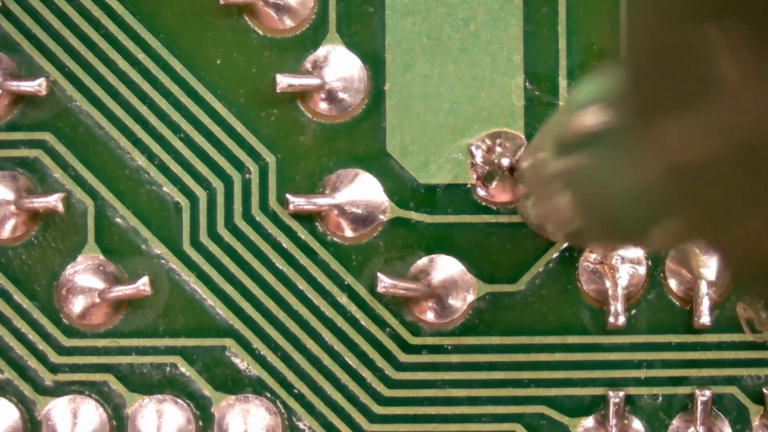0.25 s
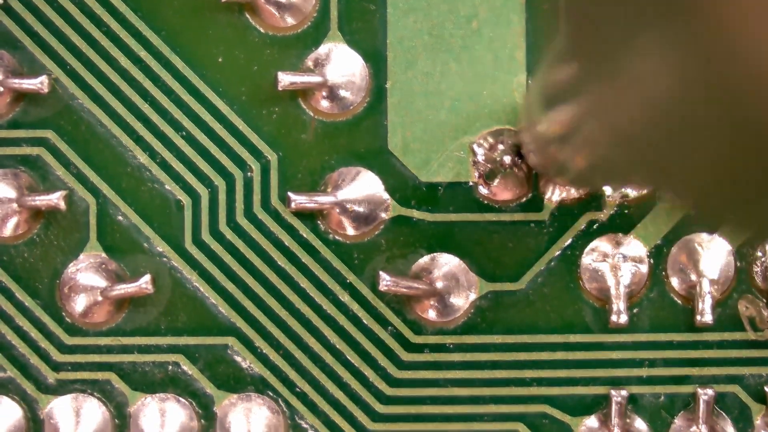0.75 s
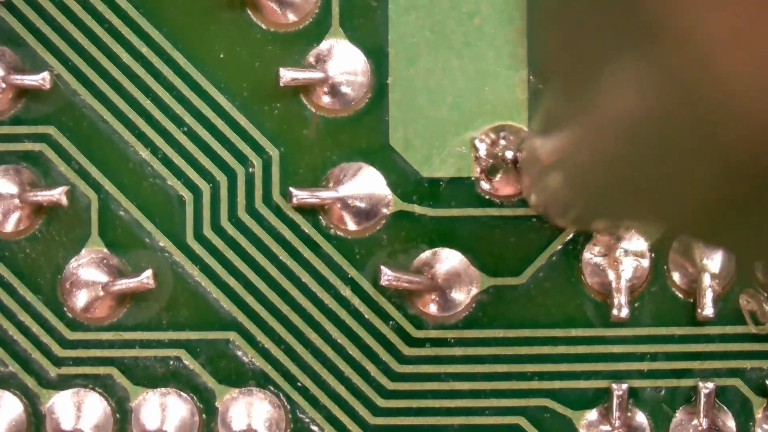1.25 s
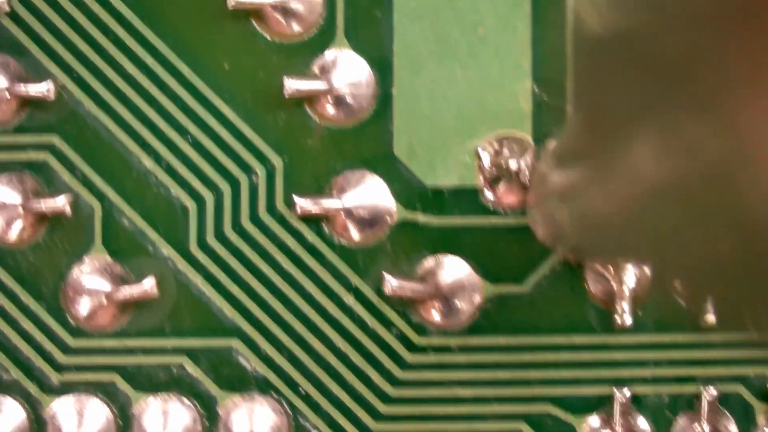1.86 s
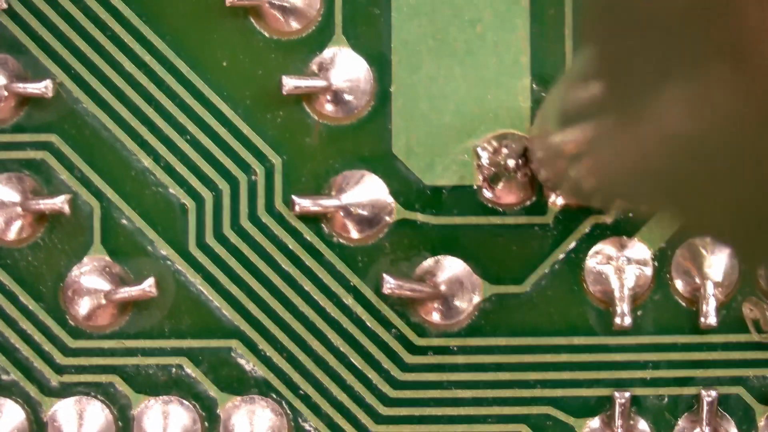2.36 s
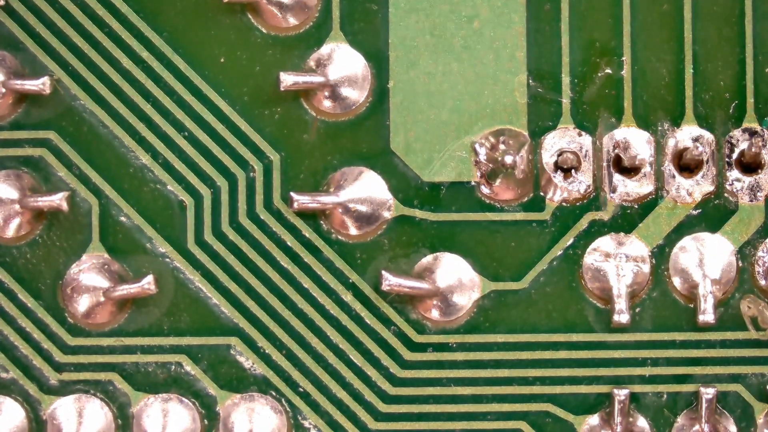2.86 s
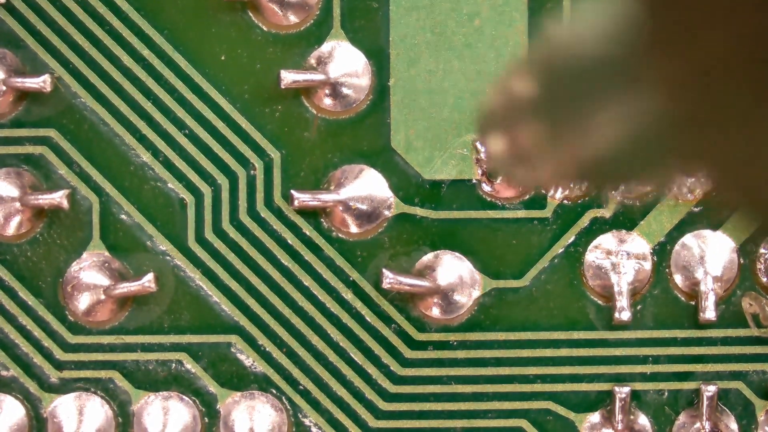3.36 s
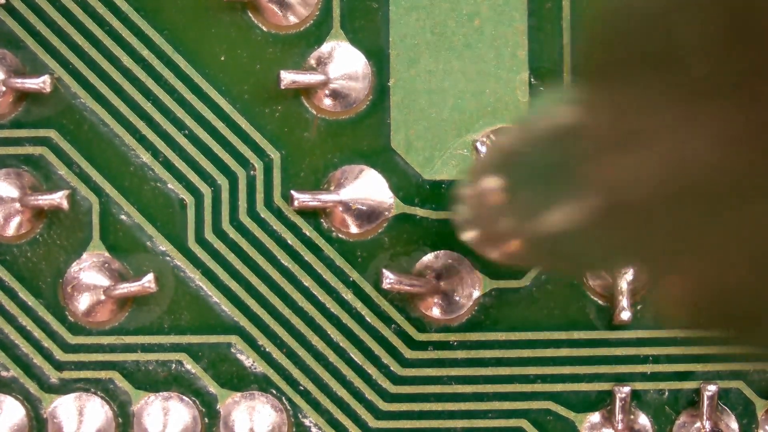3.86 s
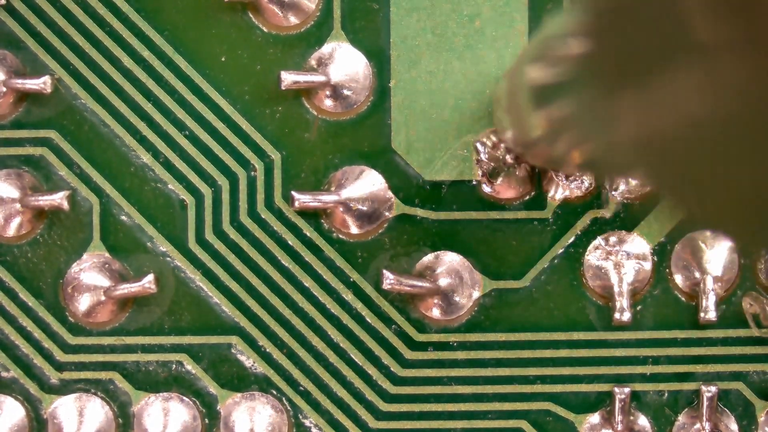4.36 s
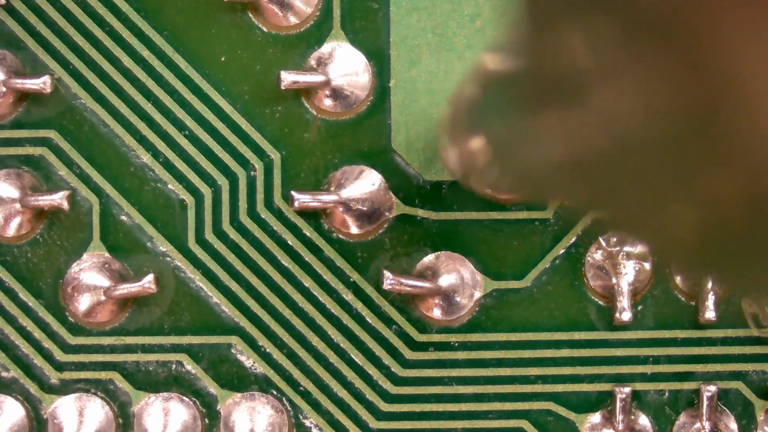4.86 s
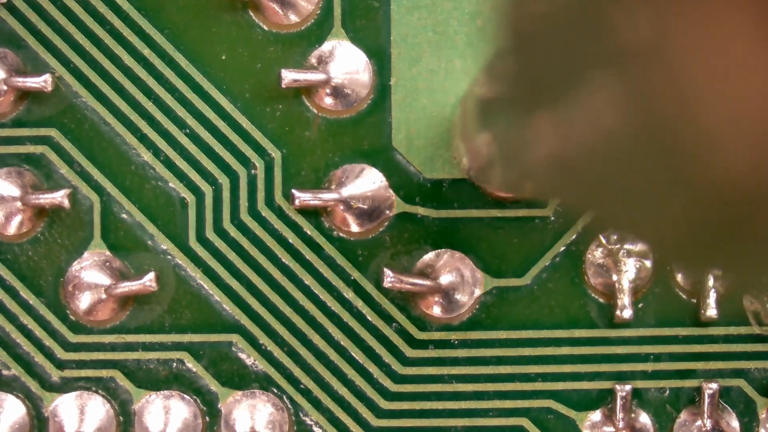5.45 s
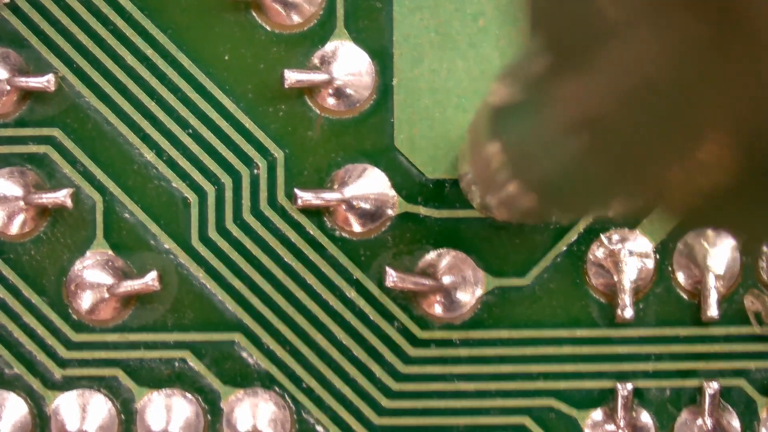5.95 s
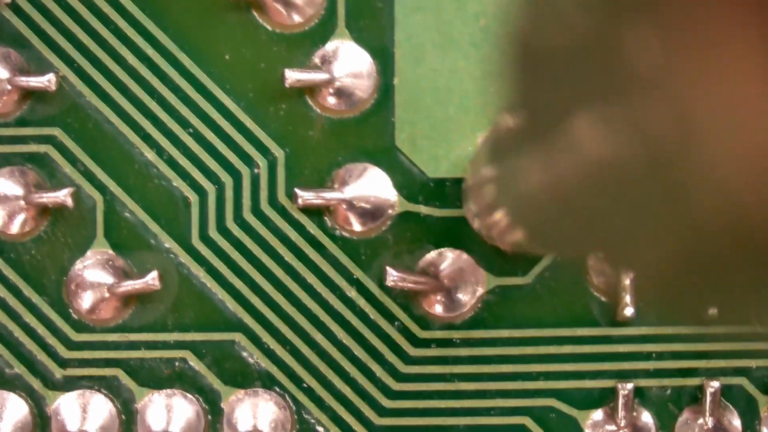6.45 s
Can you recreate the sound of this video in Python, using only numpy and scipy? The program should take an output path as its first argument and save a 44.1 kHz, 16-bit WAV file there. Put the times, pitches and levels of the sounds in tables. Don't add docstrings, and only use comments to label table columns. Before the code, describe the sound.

On a workbench in a quiet room, a small diaphragm pump drones with a rattly, rapid buzz while air hisses into a hot tip. Small scratchy ticks come as the tip rubs solder pins. Twice the tip seals: the hiss drops away and the motor dips slightly, rising in pitch on the longer seal, then air bursts back. Scraping gets busier toward the end. Close stereo microphone, hiss leaning right.

```python
import sys
import numpy as np
from scipy import signal
from scipy.fft import rfft, irfft
from scipy.io import wavfile
from scipy.ndimage import uniform_filter1d

SR = 44100
rng = np.random.default_rng(int(sys.argv[2]) if len(sys.argv) > 2 else 0)


def master_out(mix):
    frames = np.transpose(np.atleast_2d(mix))
    ceiling = np.clip(frames, -1, 1)
    pcm = np.round(ceiling * 32767).astype(np.int16)
    wavfile.write(sys.argv[1], SR, pcm)


def field_ratio(decibels):
    return 10 ** (np.asarray(decibels, dtype=float) / 20)


N = 295138

# hz, level_db_per_hz
ROOM_SPECTRUM = [(25, -11), (60, -1.2), (150, -3.5), (300, -12.5), (450, -5), (700, -11.5), (1400, -14),
                 (2600, -15), (4500, -21), (8000, -26), (11000, -51), (16000, -16)]
# hz, rms_db
MAINS_HUM = [(120.0, -68)]
# seal_s, free_s, closing_time_s
SEALS = [
    (0.739, 1.525, .025),
    (3.353, 4.447, 0.052),
]
# time_after_seal_s, vacuum (0 open .. 5 deep)
VACUUM_BUILD = [(0, 0), (.09, 1), (.24, 2), (.37, 3), (.53, 4), (.8, 4.8), (1.09, 5)]
# time_after_free_s, share_of_vacuum_left
VACUUM_VENT = [(0, 1), (.045, .64), (.095, .19), (.2, .08), (.33, .02), (.5, 0)]
# vacuum, strokes_hz
MOTOR_PACE = [(0, 49.65), (.5, 49.25), (1.2, 48.9), (2, 49.25), (3, 49.95), (4, 51.05), (4.8, 52.3),
              (5, 52.9)]
# time_s, peak_db, ring_hz, brightness_db
TICKS = [(0.117, -51.5, 2500, -12), (0.2266, -51.5, 3170, -7), (0.442, -45.5, 2490, -10),
         (0.614, -46.5, 3200, 11), (1.147, -56, 1760, -10), (1.854, -52, 3320, -13),
         (1.99, -53.5, 2440, 15.5), (2.1217, -47.5, 3020, -6), (2.401, -48.5, 2500, -9),
         (2.657, -52, 2490, -14), (2.9795, -49, 2200, -3), (3.404, -50, 2410, 2), (3.8603, -53, 1790, -12),
         (4.29, -44.5, 2500, -2), (4.7493, -43, 3000, 5), (4.871, -46.5, 2360, -2),
         (4.998, -43.5, 2540, -12), (5.2704, -43, 3150, -4), (5.408, -45.5, 2170, -12),
         (5.5892, -40.5, 3700, 7.5), (5.681, -46.5, 2220, -19), (5.83, -38.5, 3180, 1),
         (5.976, -47, 2190, -16), (6.1217, -39.5, 3100, 3.5), (6.248, -46.5, 1720, -17),
         (6.4094, -39, 2520, -3), (6.548, -47, 2270, -13)]
# time_s, peak_db, ring_hz, pan_db, contact_ms
KNOCKS = [(1.26, -51, 1210, 0, 0.47), (1.533, -39, 950, 8.5, 0.023), (3.307, -46.5, 1890, 12, 0.05),
          (3.887, -42.5, 1160, -7, 0.17), (4.285, -47, 1240, -6, .37), (4.2881, -45, 1250, -2, .27),
          (4.2911, -41.5, 680, 5, 0.11), (4.295, -42, 1080, -10, 0.16), (4.87, -45, 1190, -6, .14),
          (5.15, -43.5, 2300, -5, 0.092), (1.55, -67, 372, 9, 0.58), (4.482, -51.5, 420, 6, 0.98),
          (6.409, -49, 1390, -5, 0.074)]
# hz, width_hz, gain_db
BOARD_MODES = [(1250, 450, 2.5), (1800, 156, 4.5), (2244, 117, 4), (2780, 670, 6.5), (3440, 780, 4),
               (4630, 250, 3), (6700, 920, 1.5)]
# start_s, length_s, gain_db
GUSTS = [(0, 0.098, 2), (0.252, 0.11, 2.5), (.61, 0.16, 2), (1.516, 0.019, 10), (1.66, 0.17, 3),
         (1.98, .1, 5.5), (2.254, 0.16, 3), (2.454, .2, 2), (3.105, .15, 1.5), (4.459, 0.29, 11.5),
         (4.856, 0.02, 12), (4.974, 0.03, 12), (5.258, 0.027, 8.5), (5.39, 0.39, 2.5), (5.81, 0.12, 5.5),
         (6.037, .06, 3), (6.12, 0.098, 8), (6.283, 0.069, 4.5), (6.388, 0.13, 6), (6.554, .12, 5.5)]
# hz, level_db_per_hz
JET_SPECTRUM = [(6470, -27), (11000, -30.5), (12100, -21), (13400, -7.5), (15100, -2), (15800, -2.5)]
# hz, level_db_per_hz
RUSH_SPECTRUM = [(1470, -22), (2500, -5.5), (2670, -5), (3500, -6.5), (3800, -4), (4200, -9), (7050, -1),
                 (8630, 1.5), (10800, -6), (12500, -3), (16200, -39), (22000, -120)]
VALVE_LEVELS = [-67, -65, -67, -65.5, -65, -63]
# hz, level_db_per_hz
VALVE_SPECTRUM = [(350, -42), (600, -3), (689, -0.5), (781, -73), (1000, -2.5), (1240, -3.5), (1830, -14),
                  (1970, -23), (3470, -14), (8030, -8), (12000, -45), (15600, -96), (22000, -120)]
HARMONIC_VACUUM = [0, 1, 2, 3, 4.1, 4.8]
LOW_HARMONICS = [(-76, -76, -76, -74, -72, -69), (-64, -64, -64, -67, -71, -72),
                 (-58, -55, -54, -55, -60, -65), (-72, -74, -68, -68, -70, -71),
                 (-85, -72, -72, -87, -77, -72), (-72, -75, -71, -74, -84, -76),
                 (-62, -71, -70, -59, -60, -75), (-59, -54, -61, -54, -54, -67),
                 (-58, -61, -63, -62, -57, -65), (-70, -67, -63, -69, -70, -69),
                 (-63, -67, -68, -64, -63, -72), (-70, -69, -69, -65, -68, -67),
                 (-66, -75, -72, -73, -65, -66)]
# left_over_right_db, left_lead_open_rad, left_lead_sealed_rad
HARMONIC_PATHS = [(4, -.1, .1), (1, .1, -.1), (0, .1, .1), (-2, .2, .2), (0, .6, .4), (-2, .4, .3),
                  (1, .2, .4), (-4, 1.35, 1.1), (4, 1.2, 1.1), (0, 1.3, 3.1), (-3, .7, 2.1), (3, 2.7, 2.7),
                  (9, 1.3, .9)]
PHASE_SCATTER = [1.95, 1.1, 0.94, 1.1, 0.53, 0.95]
# hz, width_hz, rms_db, gain_at_deep_vacuum_db, left_lead_rad
CASING_MODES = [(725, 70, -77, 4, .3), (810, 60, -74, -1, .9), (885, 50, -69.5, 4, 1.5),
                (985, 70, -65.5, 3, 2.0), (1040, 80, -69, 2, 2.1), (1220, 130, -77.5, .5, 3),
                (1405, 90, -77, 5.5, 0), (1615, 110, -68, -3, -2.7), (1690, 60, -73.5, -3, 0),
                (1880, 110, -80, 7, -1.2), (2030, 150, -85, .5, 1.2), (2490, 110, -81.5, 5, .3)]


def rms_one(x):
    return x / np.sqrt(np.mean(x ** 2) + 1e-20)


def drift(rate_hz):
    r = np.exp(-80 * np.pi * rate_hz / SR)
    noise = rng.standard_normal(N // 40 + 2002)
    slow = rms_one(signal.lfilter([1], [1, -2 * r, r * r], noise)[2000:])
    return np.interp(np.arange(N) / 40, np.arange(len(slow)), slow)


def coloured(x, spectrum):
    hz, db = np.transpose(spectrum)
    bin_hz = np.fft.rfftfreq(N, 1 / SR) + 1
    gain_db = np.interp(np.log(bin_hz), np.log(hz), db, left=-90, right=db[-1])
    return rms_one(irfft(rfft(x) * field_ratio(gain_db), N))


def stereo_noise(alike, lag_s):
    common, left, right = rng.standard_normal((3, N))
    shared = np.array([np.roll(common, round(lag_s * SR)), common])
    return np.sqrt(alike) * shared + np.sqrt(1 - alike) * np.array([left, right])


def resonance(x, hz, width_hz):
    r = np.exp(-np.pi * width_hz / SR)
    zeros = np.array([1, 0, -1]) * (1 - r * r) / 2
    return signal.lfilter(zeros, [1, -2 * r * np.cos(2 * np.pi * hz / SR), r * r], x)


def along(points, x):
    return np.interp(x, *np.transpose(points))


def by_vacuum(vacuum, values):
    return np.interp(vacuum, np.arange(len(values)), values)


def room():
    t = np.arange(N) / SR
    hum = 0
    for hz, db in MAINS_HUM:
        hum = hum + np.sqrt(2) * field_ratio(db + 1.3 * drift(12.0)) * np.sin(2 * np.pi * hz * t)
    noise = stereo_noise(0.048, 0)
    low = signal.butter(2, 300, fs=SR, output="sos")
    noise += signal.sosfilt(low, rng.standard_normal(N) * 0.63 - noise)
    return field_ratio(-61.5) * coloured(noise, ROOM_SPECTRUM) + hum


def tip(contacts, grit, note_db, width_hz, early, swell):
    out, size = np.zeros((2, N)), 4096
    t = np.arange(size) / SR
    for time_s, peak_db, ring_hz, pan_db, length_s, bright_db in contacts:
        noise = rng.standard_normal((3, size))
        push = (t / length_s * np.exp(1 - t / length_s)) ** swell
        rasp = push * (1 - grit + grit * (noise[0] + 0.88 * noise[1:]))
        rattle = (1 - np.exp(-t / 0.0022)) * np.exp(-t / 0.029)
        rasp += 0.34 * noise[1:] * rattle * np.sqrt(length_s / 0.0013)

        strengths_db = rng.normal(0, 1.8, len(BOARD_MODES))
        body = 0
        for k, ((hz, mode_width_hz, gain_db), extra_db) in enumerate(zip(BOARD_MODES, strengths_db)):
            tilt_db = 0.38 * (bright_db + 0.5) * np.log2(hz / 2500)
            mode = resonance(rasp, hz, mode_width_hz)
            body = body + field_ratio(gain_db + extra_db + tilt_db) * mode * (-1) ** k
        body = body + field_ratio(note_db) * resonance(rasp, ring_hz, width_hz)
        bright = resonance(rasp, 10500, 8600)

        hit = body / np.abs(body).max() + field_ratio(bright_db - 8.0) * bright / np.abs(bright).max()
        at = round((time_s - early * length_s) * SR)
        pan = field_ratio([[pan_db / 2], [-pan_db / 2]])
        out[:, at:at + size] += field_ratio(peak_db + 3.0) * pan * hit[:, :N - at]
    return out


def scrapes():
    contacts = [(time_s, db, hz, 0.5, 0.008, bright_db) for time_s, db, hz, bright_db in TICKS]
    return tip(contacts, grit=0.9, note_db=5, width_hz=300, early=0.65, swell=4.0)


def knocks():
    neutral_ms, db_per_doubling = 0.041, -13.5
    contacts = []
    for time_s, db, hz, pan_db, contact_ms in KNOCKS:
        bright_db = db_per_doubling * np.log2(contact_ms / neutral_ms)
        contacts.append((time_s, db, hz, pan_db, contact_ms / 1000, bright_db))
    return tip(contacts, grit=0.2, note_db=13, width_hz=150, early=1, swell=2.0)


def hose():
    lag_s, inertia_s, sag_hz_per_s = 0.014, 0.02, 0.011
    venting_min_hz = 49.35
    t = np.arange(N) / SR - lag_s
    vacuum, venting = 0, 0
    for seal_s, free_s, _ in SEALS:
        built = along(VACUUM_BUILD, np.minimum(t, free_s) - seal_s)
        vacuum = vacuum + built * along(VACUUM_VENT, t - free_s)
        venting = venting + ((t > free_s) & (t < free_s + VACUUM_VENT[-1][0]))
    idle_hz = MOTOR_PACE[0][1]
    target_hz = np.maximum(along(MOTOR_PACE, vacuum), venting_min_hz * venting)
    r = np.exp(-1 / (inertia_s * SR))
    change_hz = signal.lfilter([1 - r], [1, -r], target_hz - idle_hz)
    return vacuum, idle_hz + change_hz - sag_hz_per_s * t


def flow(vacuum):
    gust_edge_s, open_s = 0.036, 0.0061
    t = np.arange(N) / SR
    gust_db, shut = 0, 0
    for start_s, length_s, db in GUSTS:
        inside_s = np.minimum(t - start_s, start_s + length_s - t)
        gust_db = gust_db + db * np.clip(inside_s / gust_edge_s + 0.5, 0, 1)
    for seal_s, free_s, close_s in SEALS:
        shut = shut + np.clip(np.minimum((t - seal_s) / close_s, (free_s - t) / open_s + 1), 0, 1)
    leak_db = -2 * shut * vacuum
    jet_db = -52 + gust_db - 19 * shut + leak_db
    rush_db = -62 + 0.25 * gust_db - 4.5 * shut + leak_db
    return jet_db, rush_db


def air(turns, vacuum):
    lag_s = 48 / SR
    jet_db, rush_db = flow(vacuum)
    jet_db = jet_db + np.minimum(jet_db + 70, 0)
    throb_db = np.cos(2 * np.pi * turns)
    aimed = stereo_noise(0.68, lag_s)
    patchy_db = 1.36 * drift(100) + 1.1 * drift(250)
    jet = coloured(aimed * field_ratio(patchy_db), JET_SPECTRUM) * field_ratio([[-9], [3.2]])
    rush = coloured(stereo_noise(0.07, lag_s), RUSH_SPECTRUM)
    rush_db = rush_db + 1.04 * throb_db + 2.5 + 0.48 * drift(42)
    return field_ratio(jet_db + throb_db + 8.5) * jet + field_ratio(rush_db) * rush


def valves(turns, vacuum):
    sharp, second, lag_s = 2.7, 0.15, -16 / SR
    gate = np.exp(-sharp * (turns % 1)) + second * np.exp(-sharp * ((turns + 0.5) % 1))
    gate = uniform_filter1d(gate, size=150)
    puffs = coloured(stereo_noise(0.3, lag_s) * gate, VALVE_SPECTRUM)
    return field_ratio(by_vacuum(vacuum, VALVE_LEVELS)) * puffs


def casing(hz, vacuum):
    between_db = -83 - 6 * np.log2(hz / 1000)
    power, pointer = field_ratio(2 * between_db), 0
    for mode_hz, width_hz, db, gain_db, lead_rad in CASING_MODES:
        part = field_ratio(db + gain_db * (vacuum / 5) ** 2) / (1 + (2 * (hz - mode_hz) / width_hz) ** 2)
        power = power + part ** 2
        pointer = pointer + part ** 2 * np.exp(1j * lead_rad)
    return 10 * np.log10(power), np.angle(pointer)


def pump(speed_hz, turns, vacuum):
    hop, top_harmonic = 32, 51
    flutter_db, smear_turns, sweep_rad = 0.68, 0.148, 0.6
    uneven_db, pan_spread_db = -1.5, 1.5
    slow = vacuum[::hop]
    stroke = np.exp(2j * np.pi * (turns - smear_turns))
    scatter_rad = by_vacuum(slow, PHASE_SCATTER)
    flutter = [drift(11.3)[::hop] for _ in range(6)]
    side = np.array([[0.5], [-0.5]])
    out, wave = np.zeros((2, N)), 1
    for k, (shift, lean, odd) in enumerate(rng.standard_normal((top_harmonic, 3)), 1):
        if k <= len(LOW_HARMONICS):
            pan_db, open_rad, sealed_rad = HARMONIC_PATHS[k - 1]
            level_db = np.interp(slow, HARMONIC_VACUUM, LOW_HARMONICS[k - 1])
            lead_rad = open_rad + slow / 5 * (sealed_rad - open_rad)
        else:
            level_db, lead_rad = casing(k * speed_hz[::hop], slow)
            level_db = level_db + uneven_db * np.sin(1.3 * slow * odd)
            pan_db = 1 + pan_spread_db * lean
        level_db = level_db + flutter_db * np.sqrt(k / 8) * flutter[k % 6]
        pan_db = pan_db * (1 - slow / 7)
        share = field_ratio(pan_db * side) / np.sqrt(np.cosh(pan_db * np.log(10) / 20))
        phase_rad = sweep_rad * k * np.log(k) + scatter_rad * shift + lead_rad * side
        envelope = np.sqrt(2) * field_ratio(level_db) * share * np.exp(1j * phase_rad)
        wave = wave * stroke
        out += (np.repeat(envelope, hop, axis=1)[:, :N] * wave).imag
    return out


def scene():
    vacuum, speed_hz = hose()
    turns = np.cumsum(speed_hz) / SR
    contacts = scrapes() + knocks()
    machine = air(turns, vacuum) + valves(turns, vacuum) + pump(speed_hz, turns, vacuum)
    return room() + contacts + machine


def top_cut(x):
    return signal.sosfilt(signal.butter(12, 16920, fs=SR, output="sos"), x)


def record(dry):
    low_pass = signal.cheby2(16, 60, 16050, fs=SR, output="sos")
    return top_cut(signal.sosfilt(low_pass, dry))


dry = scene()
out = record(dry)
master_out(out)
```